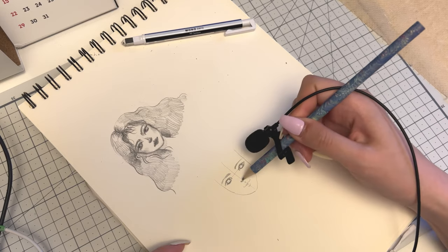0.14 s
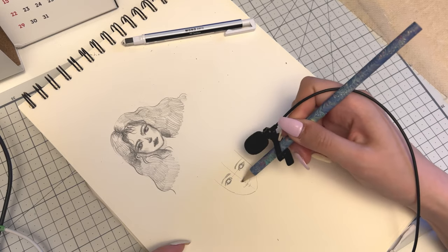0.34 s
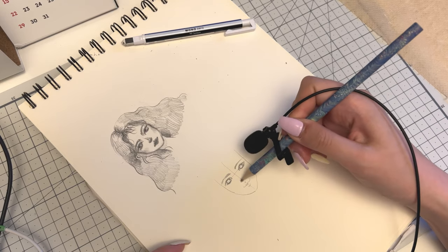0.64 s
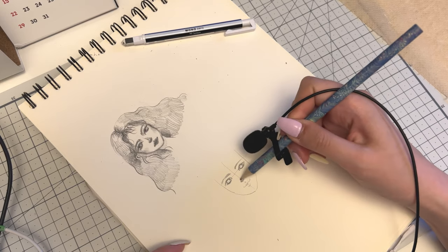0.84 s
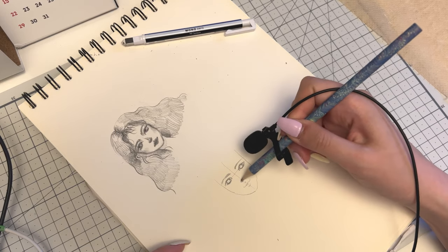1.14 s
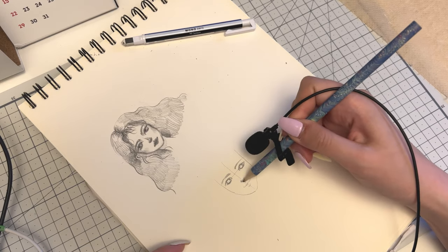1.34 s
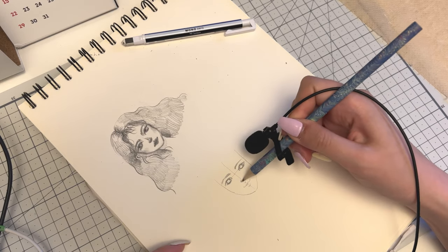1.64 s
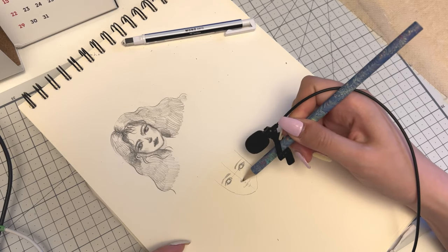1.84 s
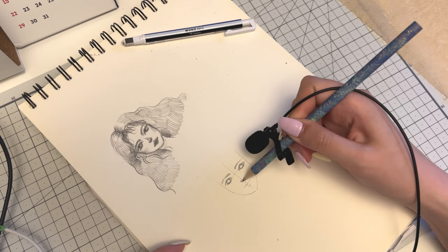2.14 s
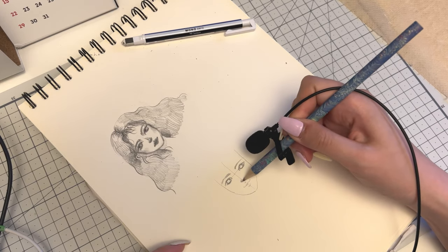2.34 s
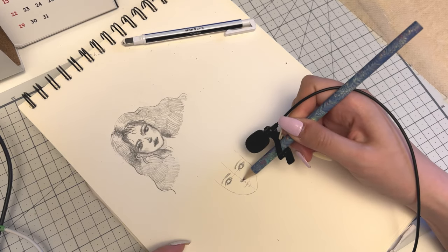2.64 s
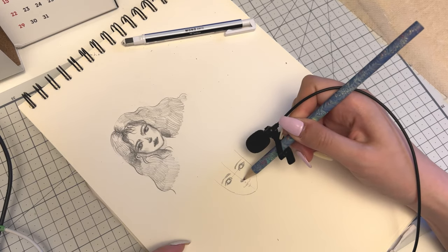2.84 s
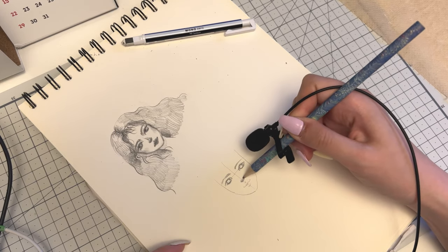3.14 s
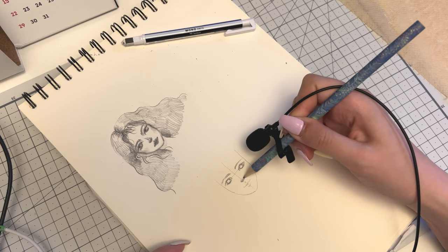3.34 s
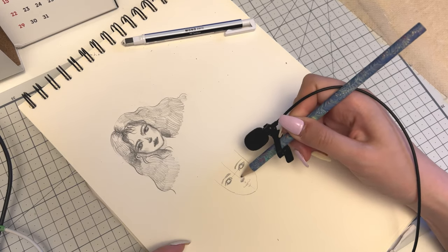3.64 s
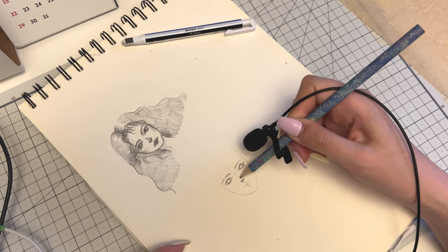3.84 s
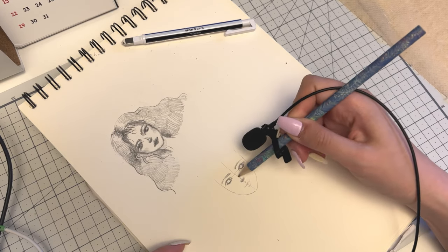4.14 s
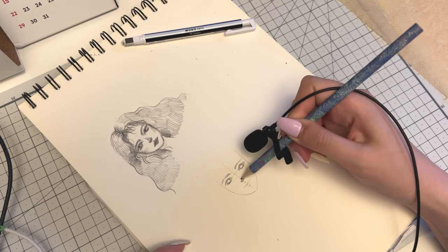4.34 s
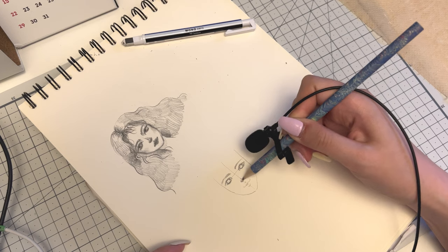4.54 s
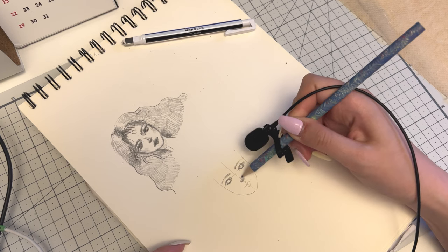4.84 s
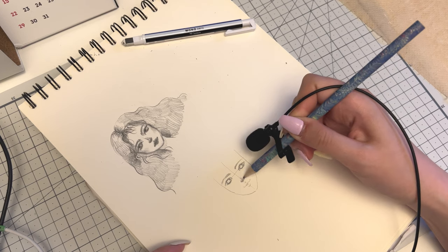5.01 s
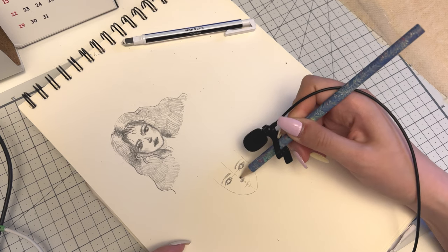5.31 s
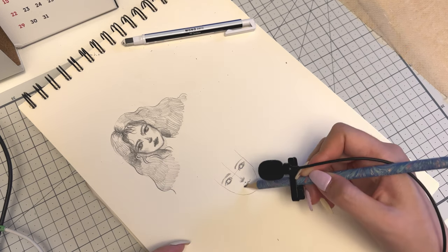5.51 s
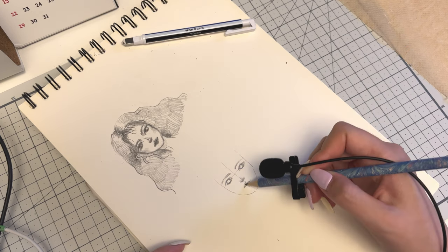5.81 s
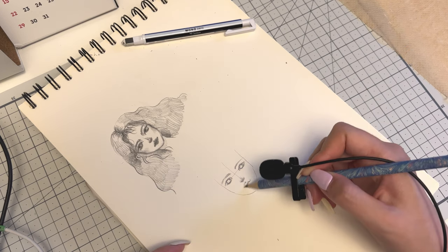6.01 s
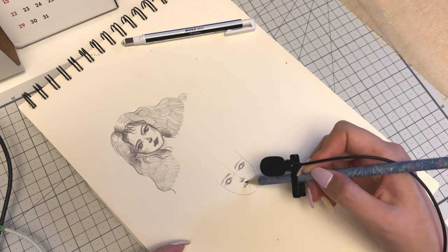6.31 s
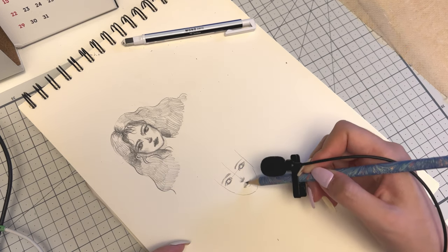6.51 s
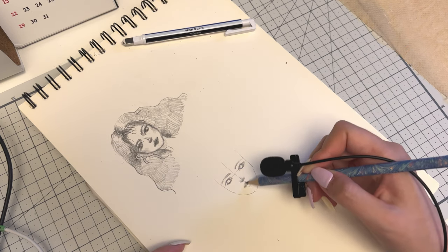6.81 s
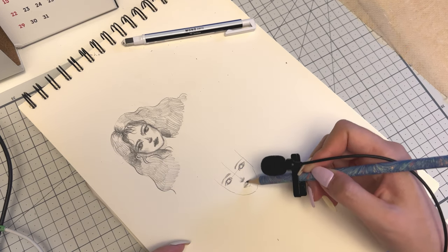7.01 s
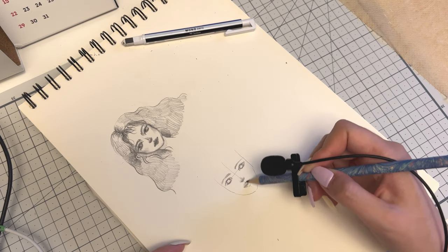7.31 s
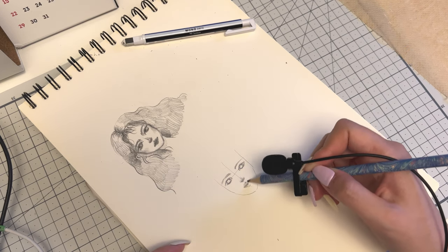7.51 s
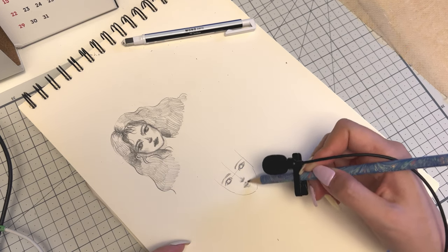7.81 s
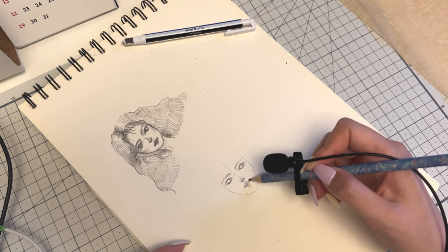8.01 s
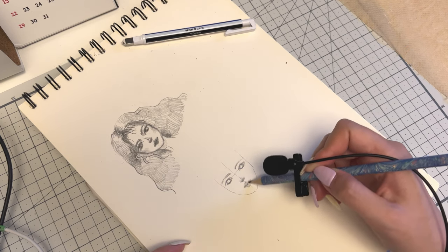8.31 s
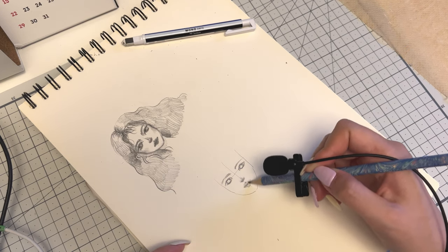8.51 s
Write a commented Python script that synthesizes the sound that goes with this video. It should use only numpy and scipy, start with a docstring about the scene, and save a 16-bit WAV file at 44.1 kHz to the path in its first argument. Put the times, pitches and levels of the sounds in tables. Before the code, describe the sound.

In a quiet room, a pencil works on a sketch pad, heard through a tiny microphone fixed just above the point. Soft room noise, faint hum and low rumble run throughout; a very faint thin whine fades by about 1.2 seconds. From 0.4 seconds, short separate strokes begin, each landing with a tiny tick and faint thud before a bright, grainy hiss of about a tenth of a second. They settle to roughly four per second, a little stronger near 4.5, while the low shudder grows towards 5.3. At about 5.4 the pencil lands flatter with a soft knock and the shudder drops. Unbroken shading follows to the end at about 8.7, swishing back and forth some eight or nine sweeps a second, alternately fuller and thinner, with brief rough swells and soft, dull knocks near 6.4, 6.9, 8.2 and 8.4.

```python
"""A pencil sketches on a pad of paper, with a tiny microphone fastened just above its point.
Low rumble and quiet room hum run throughout, with a faint thin whine in the first second or so.
Quick hatching strokes come first: the lead lands with a tick, then hisses as it snaps over paper fibres.
From 5.4 s the pencil is held flatter and shades back and forth without a break, with a few soft knocks.
The rubbing noise rings the resonances of pencil and pad; filtered noise makes the rumble, hum and room."""
import sys
import numpy as np
from scipy import signal
from scipy.fft import rfft, irfft, next_fast_len
from scipy.io import wavfile
from scipy.ndimage import uniform_filter1d

SR = 44100
rng = np.random.default_rng(int(sys.argv[2]) if len(sys.argv) > 2 else 0)


def pcm_store(signal):
    """Save signal as 16-bit PCM."""
    levels = np.round(np.clip(np.atleast_2d(signal), -1, 1) * 32767)
    wavfile.write(sys.argv[1], SR, levels.astype(np.int16).T)


N = 381906
TIME = np.arange(N) / SR
SHADING_FROM_S, SHADING_TO_S = 5.375, 8.72

# the lead lands before the strokes, and once more for the shading: start_s, level_db (relative)
TOUCHES = [(0.383, -46), (0.659, -39.5), (0.994, -34), (1.291, -37), (1.542, -35.5), (1.807, -42.5),
           (2.036, -32.5), (2.3, -32.5), (2.548, -33.5), (2.799, -34.5), (3.03, -36), (3.263, -43),
           (3.478, -35.5), (3.706, -39.5), (3.954, -36), (4.234, -36.5), (4.479, -30.5), (4.715, -37),
           (4.929, -36.5), (5.166, -36.5), (5.376, -32)]
# hatching strokes: start_s, length_s, hiss_db (relative), weight_db (relative boost of the low resonances)
STROKES = [(0.414, 0.095, -42.5, -1), (0.724, 0.1, -43.5, 0.5), (1.02, 0.11, -41, 0), (1.309, 0.11, -42, 1),
           (1.544, 0.03, -54, 1), (1.577, 0.096, -41.5, -3), (1.817, 0.1, -45, 0),
           (2.085, 0.084, -41.5, -1), (2.338, 0.097, -42, 1.5), (2.57, 0.11, -40.5, -1),
           (2.831, 0.095, -40.5, -1.5), (3.058, 0.079, -41.5, -0.5), (3.268, 0.087, -41.5, -1),
           (3.498, 0.056, -47, 2), (3.723, 0.0936, -41, -1), (3.99, 0.094, -39, 1), (4.246, 0.11, -40, 1.5),
           (4.501, 0.1, -37.5, 1), (4.736, 0.08, -40.5, -1), (4.947, 0.068, -46.5, 1.5),
           (5.168, 0.087, -45.5, 3.5)]
# resonances of pencil and pad, held steeply: pitch_hz, half_width_hz, level_db (relative)
STEEP_MODES = [(423, 104, -4.5), (750.0, 340, -11.5), (1059, 118, -0.5), (1190, 140, -4.5),
               (2273, 244, -10), (2760, 250, -18), (3398, 91, -5.5), (3650, 190, -13.5), (4180.0, 180, -22),
               (4970, 780, -20), (6860, 730, -19.5), (7750, 163, -13.5), (9600, 840, -14.5),
               (9760, 57, -4.5), (10700, 225, -3.5), (11780, 470, -8), (14100, 350.0, -12.5),
               (15900, 440, -8.5)]


def from_db(db):
    """Turn decibels into a plain multiplier."""
    return 10 ** (np.asarray(db) / 20)


def rms_one(x):
    """Scale a signal so that its average strength (rms) is 1."""
    return x / np.sqrt(np.mean(x ** 2) + 1e-20)


def butter(x, hz, kind):
    """Gentle filter that keeps only low pitches or a band of pitches."""
    sections = signal.butter(2, hz, kind, fs=SR, output="sos")
    return signal.sosfilt(sections, x + 1e-18)


def drift(rate_hz):
    """Smooth random wandering with a spread of 1."""
    noise = rng.standard_normal(N + SR)
    return rms_one(butter(noise, rate_hz, "low")[SR:])  # drop the filter's first second


def in_time(rows):
    """Join (time_s, value) rows by straight lines, giving a value at every sample."""
    return np.interp(TIME, *np.transpose(rows))


def peak(hz, centre_hz, half_width_hz):
    """Gain of one resonance: 1 at its centre, half at the half width to either side."""
    return 1 / (1 + ((hz - centre_hz) / half_width_hz) ** 2)


def coloured_noise(gain_at):
    """Noise of rms 1 whose balance of pitches follows a function of frequency."""
    size = next_fast_len(N, True)
    spectrum = rfft(rng.standard_normal(size))
    gain = gain_at(np.fft.rfftfreq(size, 1 / SR))
    return rms_one(irfft(spectrum * gain, size)[:N])


def clicks_at(rows):
    """One single-sample click for each row of (start_s, level_db)."""
    out = np.zeros(N)
    for start_s, level_db in rows:
        out[round(start_s * SR)] = from_db(level_db)
    return out


def ring(clicks, hz, t60_s):
    """Each click starts a sine that dies away by 60 dB in t60_s."""
    decay = from_db(-60 / (t60_s * SR))
    turn = 2 * np.pi * hz / SR
    return signal.lfilter([0, np.sin(turn)], [1, -2 * decay * np.cos(turn), decay * decay], clicks + 1e-18)


def arc(start_s, end_s, fastest_share):
    """Speed of one hand movement: from rest up to 1 and back to rest."""
    out = np.zeros(N)
    inside = slice(round(start_s * SR), round(end_s * SR))
    top_s = start_s + np.clip(fastest_share, .05, .95) * (end_s - start_s)
    progress = np.interp(TIME[inside], [start_s, top_s, end_s], [0, .5, 1])
    out[inside] = np.abs(np.sin(np.pi * progress))
    return out


def room():
    """Soft room noise and narrow hums; a faint thin whine swells and is gone by 1.25 s."""
    # background noise of room and microphone: pitch_hz, level_db (relative, per hertz)
    room_points = [(90, 1.5), (130, 0.5), (220, -2.5), (400, -3.5), (560, -6.5), (1100, -7), (1500, -13.5),
                   (2300, -17), (3100, -22), (3900, -28), (6000, -34.5), (10000, -39), (16000, -43.5)]
    # steady hums: pitch_hz, half_width_hz, level_db
    hum_bands = [(120.5, 5.4, -61.5), (171.1, 5.1, -65), (245.6, 18, -69)]
    points_hz, points_db = np.transpose(room_points)

    def room_gain(hz):
        """Room noise falls along the points, spaced by the logarithm of pitch."""
        return from_db(np.interp(np.log(hz + 1), np.log(points_hz), points_db))

    air = from_db(-50) * coloured_noise(room_gain)
    hum = sum(from_db(level_db) * coloured_noise(lambda hz: peak(hz, pitch_hz, half_width_hz))
              for pitch_hz, half_width_hz, level_db in hum_bands)
    whine_level = np.sqrt(2) * from_db(-63 + 4.1 * drift(27))
    whine_hz = 1747 + 14 * drift(36)
    whine = whine_level * np.sin(2 * np.pi * np.cumsum(whine_hz) / SR)
    higher_band = from_db(-74) * coloured_noise(lambda hz: peak(hz, 3130, 45))
    whine_fade = np.interp(TIME, [0, .2, .9, 1.25], [0.57, 0.71, 1, 0])
    return air + hum + (whine + higher_band) * whine_fade


def handling():
    """The microphone rides on the pencil: it rumbles, drones, sways with each stroke and is knocked."""
    # low shudder of the held pencil and its cable: pitch_hz, half_width_hz, level_db (relative)
    shudder_modes = [(51.2, 11, 3), (74.2, 10.3, -2)]
    # shudder builds through the hatching, drops with the flatter grip: time_s, level_db (before a trim)
    shudder_levels = [(0, -45.5), (2.4, -45), (4.2, -43), (5.33, -37), (5.52, -55.5), (8.66, -50)]
    # level of the low drone: time_s, level_db
    drone_levels = [(0, -57.5), (2.3, -53), (4.3, -56.5), (5.5, -59), (8.66, -59)]
    # soft knocks of the hand against the microphone's holder: start_s, level_db (relative)
    knock_rows = [(5.412, -36.5), (6.376, -45), (6.892, -37), (8.238, -40.5), (8.44, -41)]
    # dull tones that a knock rings: pitch_hz, level_db (relative), t60_s (time to fall by 60 dB)
    knock_modes = [(82, 6.5, 0.036), (176, 11.5, 0.0078), (310, 12.5, 0.0049), (620, -6, 0.0059)]

    def shudder_gain(hz):
        """Add up the shudder resonances."""
        return sum(from_db(level_db) * peak(hz, pitch_hz, half_width_hz)
                   for pitch_hz, half_width_hz, level_db in shudder_modes)

    deep = from_db(-45) * coloured_noise(lambda hz: peak(hz, 25.86, 6.3))
    shudder_trim_db = -0.5
    shudder = from_db(in_time(shudder_levels) + shudder_trim_db) * coloured_noise(shudder_gain)
    drone = from_db(in_time(drone_levels)) * coloured_noise(lambda hz: peak(hz, 173, 8))

    # each stroke pushes the microphone, starting a little early and ending a little late
    pushes = np.max([arc(start_s - .08, start_s + length_s + 0.041, 0.72)
                     for start_s, length_s, *rest in STROKES], axis=0)
    sway = from_db(-20.5) * (pushes - uniform_filter1d(pushes, SR // 4))  # remove the slow average

    shading_fade = np.clip((TIME - SHADING_FROM_S) * 10, 0, 1)
    rocking = from_db(-36) * coloured_noise(lambda hz: peak(hz, 12.0, 2.4)) * shading_fade

    knock_clicks = clicks_at(knock_rows)
    thumps = sum(from_db(level_db) * ring(knock_clicks, pitch_hz, t60_s)
                 for pitch_hz, level_db, t60_s in knock_modes)
    return deep + shudder + drone + sway + rocking + thumps


def body_response(modes, size=2048):
    """How pencil and pad ring after one tap, scaled to unit power in the hiss above 4 kHz."""
    hz = np.fft.rfftfreq(size, 1 / SR)
    power = sum((from_db(level_db) * peak(hz, pitch_hz, half_width_hz)) ** 2
                for pitch_hz, half_width_hz, level_db in modes)
    power = power / np.mean(power * (hz > 4000))
    # fold the cepstrum (spectrum of the log spectrum) so the ringing starts at the tap, not before it
    cepstrum = irfft(np.log(power + 1e-9) / 2)
    folded = np.r_[cepstrum[0], 2 * cepstrum[1:size // 2]]
    return irfft(np.exp(rfft(folded, size)))[:size // 2]


def landings():
    """The hard point gives a very short tick, rings the pencil faintly and thuds on the pad."""
    clicks = clicks_at(TOUCHES)
    tick = ring(clicks, 8600, 0.00052) + from_db(1.0) * ring(clicks, 2600, 0.00041)
    pencil = from_db(4.0) * signal.fftconvolve(clicks, body_response(STEEP_MODES))[:N]
    thud = from_db(15.0) * ring(clicks, 23, 0.053) + from_db(1.5) * ring(clicks, 96, 0.022)
    return tick + pencil + thud


def contact(start_s, end_s):
    """Pressure of one stroke: the lead presses in quickly, holds and lifts off quickly."""
    press_s, lift_s = 0.013, 0.018
    press = np.clip((TIME - start_s) / press_s, 0, 1)
    lift = np.clip((end_s - TIME) / lift_s, 0, 1)
    edges = press * lift
    return edges * edges * (3 - 2 * edges)  # round off the corners


def tooth(speed, fibres_per_s, size_spread_db, smooth_share):
    """The lead snaps over paper fibres, more of them when it is fast, above a smooth rubbing noise."""
    rate = fibres_per_s * (.25 + speed)
    signs = rng.choice([-1, 1], N)
    sizes = signs * from_db(size_spread_db * np.minimum(rng.exponential(1, N), 4))
    hits = rng.random(N) < rate / SR
    snaps = rms_one(sizes * hits / np.sqrt(rate))  # keeps the strength even while the rate changes
    return rms_one(snaps + smooth_share * rng.standard_normal(N))


def slips(per_s, relax_s=0.0042):
    """Stick and slip: friction jumps at uneven intervals and relaxes in between; spread 1."""
    at = np.cumsum(rng.gamma(3, 1 / 3, 4000) * SR / per_s).astype(int)
    sizes = rng.uniform(.4, 1, 4000)
    inside = at < N
    jumps = np.bincount(at[inside], sizes[inside], N)
    saw = signal.lfilter([1], [1, -np.exp(-1 / (relax_s * SR))], jumps)
    return rms_one(saw - saw.mean())


def uneven_gain(length_s=0.0054):
    """The paper's rough tooth makes friction uneven: a few brief swells on top of small random changes."""
    # moments when the rubbing swells briefly, where a row of 0 dB adds no swell: time_s, extra_db
    swells = [(0.773, 4), (1.04, 5), (1.346, 1), (2.388, 5), (2.63, 0), (2.886, 0), (4.556, 6.5),
              (4.576, 3.5), (6.633, 7.5), (6.738, 4), (7.125, 5.5), (7.637, 7.5), (7.808, 10), (8.351, 6)]
    at_s, extra_db = np.transpose(swells)
    nearest = np.searchsorted((at_s[1:] + at_s[:-1]) / 2, TIME)
    swell_db = extra_db[nearest] * np.exp(-((TIME - at_s[nearest]) / length_s) ** 2)
    uneven_db = 1.0 * drift(60)
    return from_db(swell_db + uneven_db)


def scratch(friction, modes, weight_db, weight_hz, judder_db, slips_per_s, low_judder_db, grip_shift):
    """Friction sticks, slips and rings pencil and pad; a heavier hand brings out the low resonances."""
    judder = rms_one(from_db(judder_db * slips(slips_per_s)))
    force = friction * judder * uneven_gain()
    # a changing grip stiffens and slackens the pencil, so its resonances wander a little
    slack_modes = np.multiply(modes, [1 - grip_shift, 1, 1])
    stiff_modes = np.multiply(modes, [1 + grip_shift, 1, 1])
    slack = signal.fftconvolve(force, body_response(slack_modes))[:N]
    stiff = signal.fftconvolve(force, body_response(stiff_modes))[:N]
    grip = .5 + .5 * np.tanh(2 * drift(12.2))
    sound = slack + grip * (stiff - slack)
    # filter forwards and backwards, so the low band stays lined up in time
    low = butter(sound, weight_hz, "band")
    low = butter(low[::-1], weight_hz, "band")[::-1]
    return sound - low + low * from_db(weight_db + low_judder_db * drift(54))


def hatching():
    """Separate strokes: the lead lands, drags lightly, sweeps and lifts."""
    fastest_share, taper = .5, 0.42  # taper: how strongly the level follows the speed
    gain_db, extra_weight_db = -1, 2
    speed, level, weights = np.zeros(N), np.zeros(N), []
    for start_s, length_s, hiss_db, weight_db in STROKES:
        end_s = start_s + length_s
        sweep = arc(start_s, end_s, fastest_share)
        speed += sweep
        level += from_db(hiss_db + gain_db) * contact(start_s, end_s) * sweep ** taper
        weights.append((start_s + length_s / 2, weight_db))
    for touch_s, tick_db in TOUCHES:
        level += from_db(-69) * arc(touch_s, touch_s + 0.033, 0.25)  # light drag after landing
    friction = level * tooth(speed, fibres_per_s=6000, size_spread_db=3.0, smooth_share=0.64)
    return scratch(friction, STEEP_MODES, extra_weight_db + in_time(weights), weight_hz=[720, 1650],
                   judder_db=1.5, slips_per_s=110, low_judder_db=0.0, grip_shift=0.0087)


def shading():
    """The lead stays on the paper, pushed and pulled in turn, and only slows at each turn."""
    # pushes and pulls in turn, each lasting until the next turn: start_s, hiss_db (relative)
    swings = [(5.374, -48), (5.459, -49), (5.563, -46), (5.691, -46.5), (5.803, -44.5), (5.923, -43),
              (6.032, -43.5), (6.142, -42), (6.245, -44.5), (6.377, -43.6), (6.474, -46.5), (6.599, -48),
              (6.712, -45.5), (6.827, -43), (6.939, -49.5), (7.099, -44.5), (7.212, -42), (7.35, -43),
              (7.472, -42), (7.585, -45), (7.707, -47.5), (7.841, -43), (7.966, -43.5), (8.068, -44.5),
              (8.193, -43), (8.291, -50.5), (8.402, -45), (8.521, -45), (8.631, -44)]
    # hiss that remains at the turns: time_s, level_db (relative)
    turn_hiss = [(5.4, -63), (5.7, -66.5), (6.03, -77), (6.35, -61), (7.0, -64.5), (7.3, -61), (8.0, -57.5),
                 (8.66, -66.5)]
    # resonances of pencil and pad, held flat: pitch_hz, half_width_hz, level_db (relative)
    flat_modes = [(370, 230, -13), (730, 180, -11), (1051, 84, 3), (1197, 112, 1), (2370, 168, -3),
                  (2622, 158, -6), (3454, 117, -10.5), (3930, 460, -26.5), (5150, 530, -24.5),
                  (6800, 1000, -22.5), (8000, 390, -23.5), (9860, 1160, -15.5), (10680, 180, -4.5),
                  (11360, 174, -3.5), (12300, 530, -19), (14100, 410.0, -18.5), (15200, 580, -17)]
    # a push gathers speed late and sounds fuller, a pull is quick off the turn and thinner:
    # share of the swing at which it is fastest, boost of the low resonances in dB before slow_db
    push, pull = (.54, -3), (0.29, -5.5)
    taper = 1.38  # how strongly the level follows the speed
    ends_s = [start_s for start_s, hiss_db in swings[1:]] + [SHADING_TO_S]
    speed, weights = np.zeros(N), []
    level = from_db(in_time(turn_hiss)) * (TIME > SHADING_FROM_S)
    for k, ((start_s, hiss_db), end_s) in enumerate(zip(swings, ends_s)):
        fastest_share, weight_db = pull if k % 2 else push
        sweep = arc(start_s, end_s, fastest_share)
        speed += sweep
        level += from_db(hiss_db) * sweep ** taper
        weights.append(((start_s + end_s) / 2, weight_db))
    slow_db = 0.74 * (1 - speed)  # a slow lead sounds duller
    friction = level * tooth(speed, fibres_per_s=7000, size_spread_db=2.5, smooth_share=1.0)
    return scratch(friction, flat_modes, in_time(weights) + slow_db, weight_hz=[500, 2000],
                   judder_db=1.04, slips_per_s=130, low_judder_db=2.0, grip_shift=0.015)


def scene():
    """Everything adds up at the one close microphone."""
    return (room() + handling() + landings() + hatching() + shading())[None]


def record(dry):
    """The sound eases in over 6 milliseconds and the top is cut steeply at 15.8 kHz."""
    eased = dry * np.sin(np.pi / 2 * np.minimum(TIME / .006, 1)) ** 2
    top_cut = signal.firwin(301, 15800, window=("kaiser", 8), fs=SR)
    return signal.fftconvolve(eased, top_cut[None], "same")


dry = scene()
out = record(dry)
pcm_store(out)
```